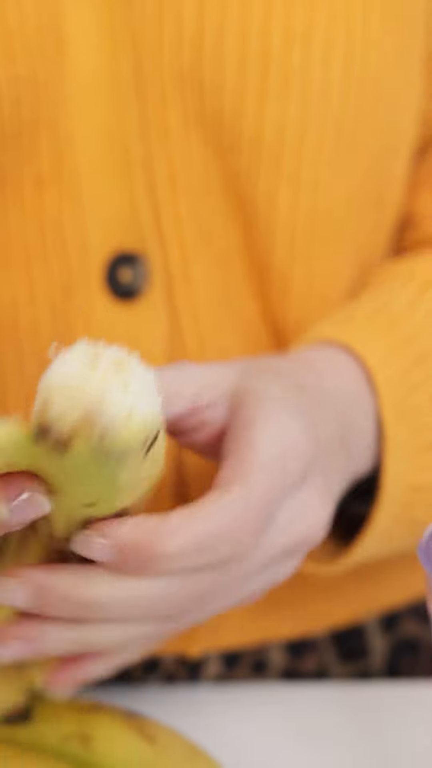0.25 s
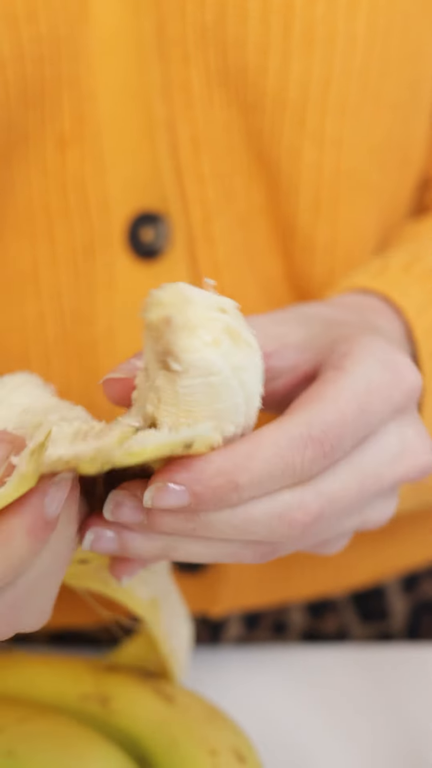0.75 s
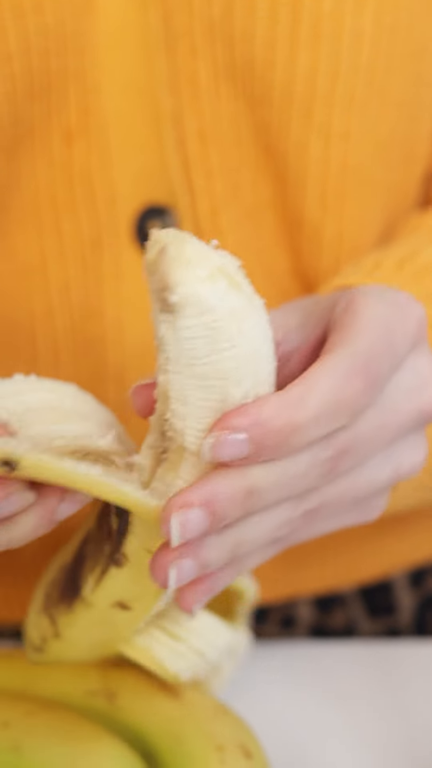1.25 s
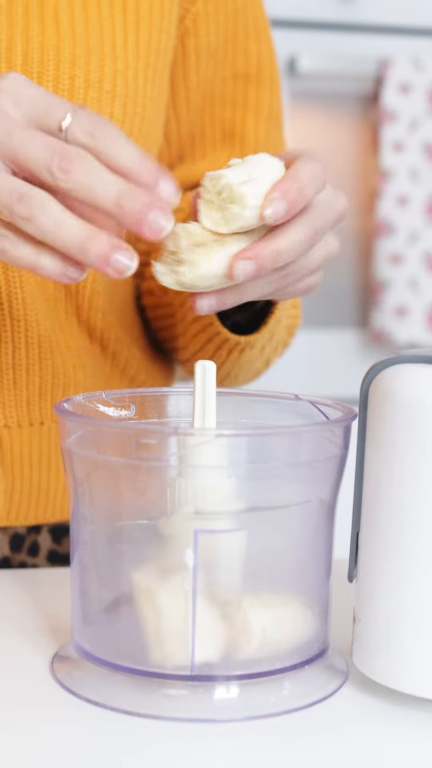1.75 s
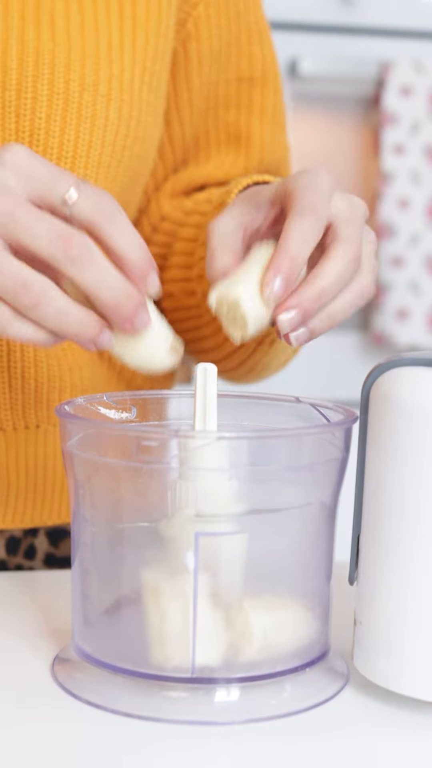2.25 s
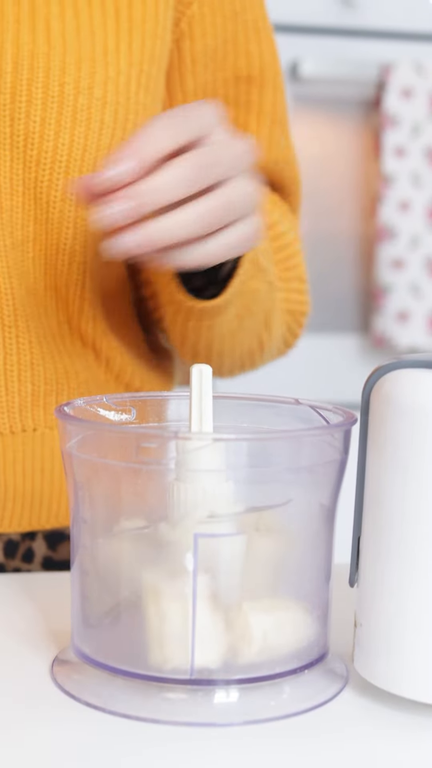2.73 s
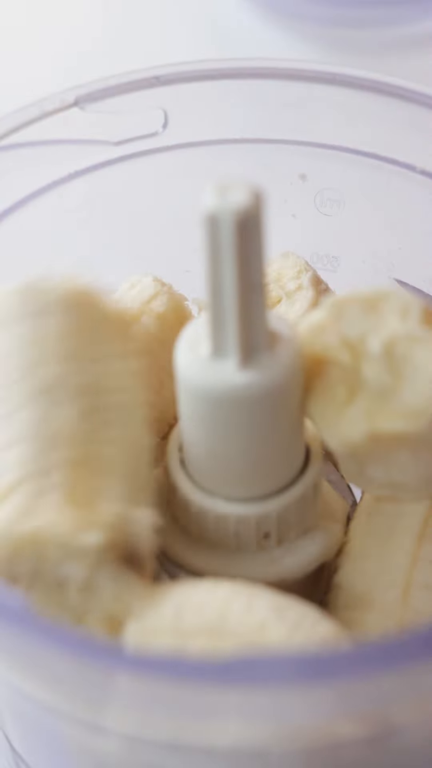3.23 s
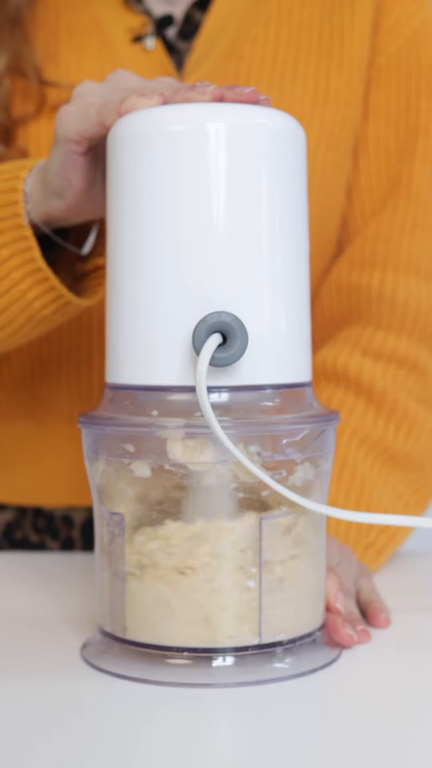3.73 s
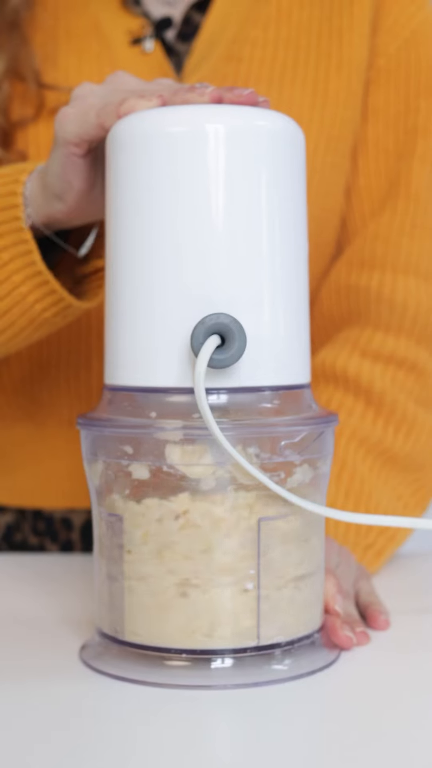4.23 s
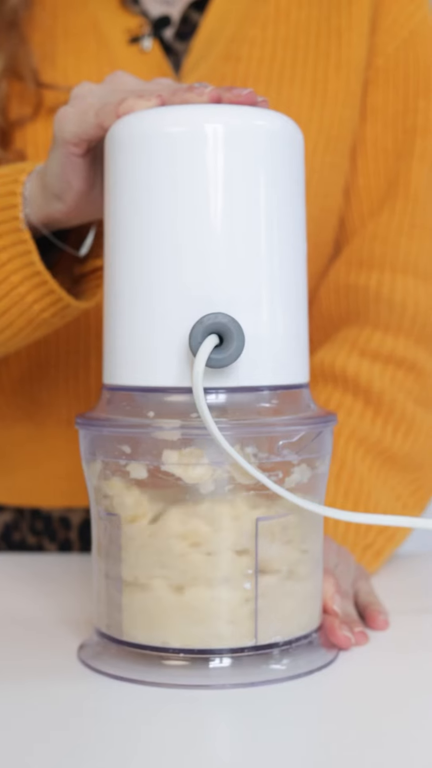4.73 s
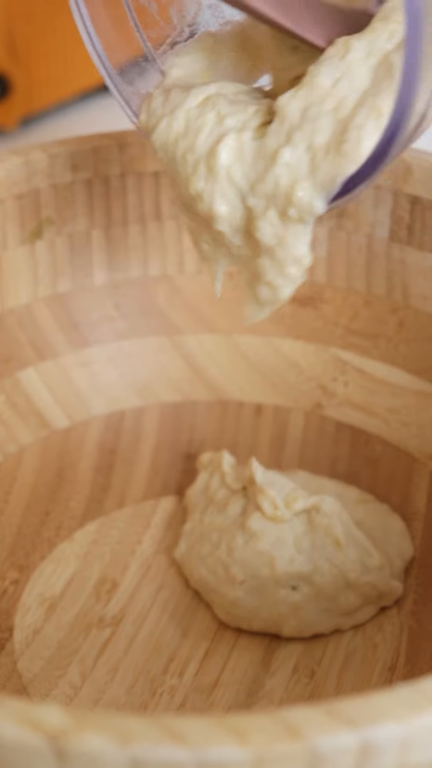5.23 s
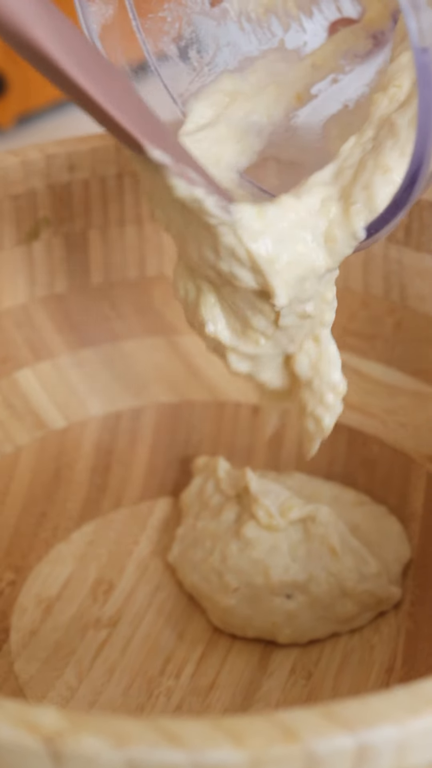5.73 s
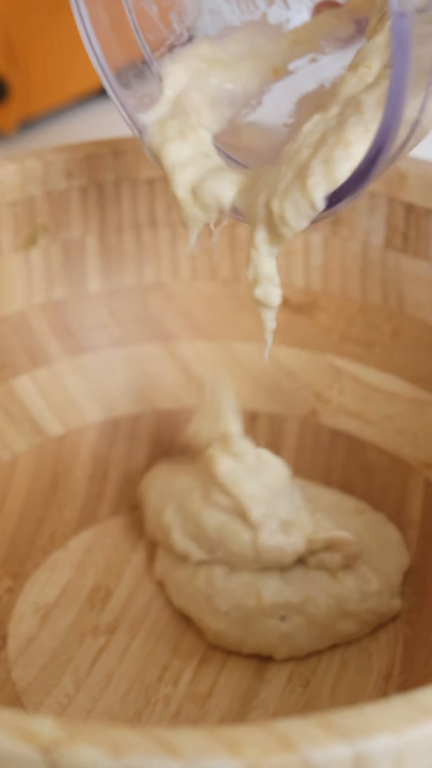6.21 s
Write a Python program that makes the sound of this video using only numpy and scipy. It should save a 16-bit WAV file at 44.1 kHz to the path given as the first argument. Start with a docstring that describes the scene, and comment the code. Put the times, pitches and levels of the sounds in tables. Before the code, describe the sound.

In a quiet kitchen, fruit drops hollowly into a plastic bowl, a mini chopper grinds abruptly on and off, then mash lands softly.

```python
"""Banana in a mini chopper

A banana is peeled and dropped piece by piece into a plastic bowl in a quiet kitchen; each contact rings
the bowl's air cavity and walls. The chopper is heard at full speed, cut in and out abruptly: singing gears,
loaded mainly by one current pulse per mains cycle, over noisy grinding and churning. Then the mash is
scraped out and lands in a wooden bowl, heard as soft knocks and wet ticks. A fridge hums throughout."""
import sys
import numpy as np
from scipy import signal
from scipy.fft import rfft, irfft, next_fast_len
from scipy.io import wavfile

SR = 44100
rng = np.random.default_rng(int(sys.argv[2]) if len(sys.argv) > 2 else 0)


def magnitude_from_level(level_db):
    """Linear magnitude for a level in decibels (20 dB per decade)."""
    exponent = np.asarray(level_db, float) / 20
    return 10 ** exponent


def master_out(mix):
    """Clip the mix to full scale and print it as 16-bit PCM to the path in sys.argv[1]."""
    frames = np.transpose(np.atleast_2d(mix))
    ceiling = np.clip(frames, -1, 1)
    pcm = np.round(ceiling * 32767).astype(np.int16)
    wavfile.write(sys.argv[1], SR, pcm)


N = 285062
T = np.arange(N) / SR   # time in seconds


def rms_one(x):
    """Scale to unit rms."""
    return x / np.sqrt(np.mean(x ** 2) + 1e-20)


def in_time(rows):
    """Join each column by straight lines in time."""
    seconds, *columns = np.transpose(rows)
    return [np.interp(T, seconds, column) for column in columns]


def at_hz(points, hz):
    """Read a spectrum on a logarithmic frequency axis."""
    point_hz, values = np.transpose(points)
    return np.interp(np.log(np.maximum(hz, 1)), np.log(point_hz), values)


def drift(rate_hz):
    """Slow random wander of rms 1: smoothed noise, drawn at every tenth sample."""
    r = np.exp(-20 * np.pi * rate_hz / SR)
    noise = rng.standard_normal(N // 10 + 5002)
    slow = signal.lfilter([1], [1, -2 * r, r * r], noise)[5000:]   # skip the filter's start
    return np.interp(np.arange(N) / 10, np.arange(len(slow)), rms_one(slow))


def coloured(x, spectrum, peaks=()):
    """Give a white signal a spectrum and some resonant boosts; rms 1."""
    hz = np.fft.rfftfreq(N, 1 / SR)
    boosts = sum(boost / (1 + (2 * (hz - centre) / width) ** 2) for centre, width, boost in peaks)
    db = at_hz(spectrum, hz) + boosts
    inside = hz > spectrum[0][0] / 2
    return rms_one(irfft(rfft(x) * magnitude_from_level(db) * inside, N))


def grains(per_s, spread_db):
    """Random clicks of uneven size and sign."""
    uneven_db = spread_db * np.minimum(rng.exponential(1, N), 5)
    sizes = magnitude_from_level(uneven_db) * rng.standard_normal(N)
    return sizes * (rng.random(N) < per_s / SR)


def resonance(x, hz, width_hz):
    """Keep a band around one resonance; rms 1."""
    edges = [hz - width_hz / 2, hz + width_hz / 2]
    return rms_one(signal.sosfilt(signal.butter(2, edges, "band", fs=SR, output="sos"), x))


def add(out, at_s, db, hz, t60, rise_s):
    """One soft blow on one mode: it swells over the contact time and dies."""
    start = int(at_s * SR)
    t = T[:min(int(1.2 * t60 * SR), N - start)]
    swell = (1 - np.exp(-t / rise_s)) ** 2
    out[start:start + len(t)] += magnitude_from_level(db - 60 * t / t60) * swell * np.sin(2 * np.pi * hz * t)


# How long the kitchen echoes. Each row: frequency in Hz, time to fall by 60 dB in seconds.
KITCHEN_DECAY = [(100, 0.47), (700, 0.73), (1800, 0.7), (5000, 0.57), (12000, 0.039)]


def kitchen(x):
    """A diffuse tail of noise bands whose decay time follows the frequency."""
    size = next_fast_len(N + SR)
    edges, tail = 60 * 2.0 ** np.arange(0, 8.1, .5), np.zeros(SR)
    for low, high in zip(edges, edges[1:]):
        sos = signal.butter(2, [low, high], "band", fs=SR, output="sos")
        band = signal.sosfilt(sos, rng.standard_normal(SR))
        tail += band * magnitude_from_level(-60 * T[:SR] / at_hz(KITCHEN_DECAY, np.sqrt(low * high)))
    tail *= np.clip(T[:SR] / 0.015, 0, 1) / np.sqrt(np.sum(tail ** 2))   # fades in over 15 ms; energy 1
    return irfft(rfft(x, size) * rfft(tail, size), size)[:N]


# Spectrum of the room's air noise. Each row: frequency in Hz, relative density in dB.
AIR_COLOUR = [(30, -10), (50, -18.5), (75, -19), (100, -16), (200, -6), (330, -9.5), (520, -7.5),
              (700, -12.5), (1100, -20), (2100, -31), (4000, -35.5), (12500, -39), (13300, -54.5),
              (16000, -71.5)]
# Hum lines of the fridge. Each row: frequency in Hz, relative level in dB.
FRIDGE_LINES = [(50.05, -22), (100.1, -1.5), (300.3, -8), (421, -13.5), (500.5, -13), (640, -14)]
AIR_DB, HUM_DB = -57.5, -56.5   # air noise rms; added to every fridge line


def room_tone():
    """Low air noise and the slowly wavering mains lines of a fridge."""
    hum = 0
    for hz, db in FRIDGE_LINES:
        level = np.sqrt(2) * magnitude_from_level(db + 0.86 * drift(3.1))
        hum = hum + level * np.sin(2 * np.pi * hz * T + 0.45 * drift(3.3))
    air = coloured(rng.standard_normal(N), AIR_COLOUR)
    return magnitude_from_level(AIR_DB + .5 * drift(0.65)) * air + magnitude_from_level(HUM_DB) * hum


SWELL_DB_PER_S, FADE_DB_PER_S = 148, 149   # how fast a movement sets in and dies away


def rustle(moves, colour, per_s):
    """Dense fine crackle that swells, holds unevenly and fades with each movement."""
    level = 0
    for at, hold, db in moves:
        swell_db = SWELL_DB_PER_S * np.maximum(at - T, 0)
        fade_db = FADE_DB_PER_S * np.maximum(T - at - hold, 0)
        level = level + magnitude_from_level(db - swell_db - fade_db)
    return level * magnitude_from_level(1.3 * drift(25)) * coloured(grains(per_s, spread_db=1.0), colour)


# A sleeve brushing past. Each row: start of the hold in seconds, hold in seconds, level in dB.
SLEEVE_MOVES = [(0.02, 0.042, -66), (0.15, 0.033, -79), (0.32, 0.034, -77), (0.46, 0.06, -78),
                (0.885, 0.025, -73.5), (2.89, 0.1, -69), (3.06, 0.11, -72.5), (3.46, 0.16, -66)]
# Spectrum of the cloth. Each row: frequency in Hz, relative density in dB.
CLOTH_COLOUR = [(1200, 7.5), (2500, 2), (6000, -5.5), (9000, -8), (13000, -49)]


def sleeve():
    """Cloth rubbing: very dense fine crackle."""
    return rustle(SLEEVE_MOVES, CLOTH_COLOUR, per_s=17000)


# Tugs at the peel, hands rubbing. Each row: start of the hold in seconds, hold in seconds, level in dB.
PEEL_MOVES = [(0.11, 0.041, -60), (0.33, 0.022, -75.5), (0.47, 0.01, -75), (0.68, 0.094, -63.5),
              (1.27, 0.26, -67), (2.37, 0.03, -77)]
# Spectrum of the peel. Each row: frequency in Hz, relative density in dB.
SKIN_COLOUR = [(1470, -0.5), (2500, -9), (3790, -23), (4710, -5.5), (8260, -6.5), (12600, -4.5),
               (15800, -9)]


def peel():
    """Tugging and rubbing: a sparser, brighter crackle than the sleeve."""
    return rustle(PEEL_MOVES, SKIN_COLOUR, per_s=7100)


# Wet ticks of skin and fruit on plastic, and of mash landing on wood. Each row: start in seconds, peak level in
# dB (roughly), centre in Hz.
WET_TICKS = [(0.0776, -58, 8790), (0.164, -57, 6920), (0.3294, -66, 5140), (0.4734, -61, 4200),
             (0.6924, -53, 4710), (0.7794, -52, 8660), (0.8776, -61, 2300), (0.888, -52, 1590),
             (1.2964, -60, 8860), (1.6386, -45, 5100), (1.715, -41, 4500), (1.757, -53, 5500),
             (1.838, -51.5, 5240), (2.464, -40, 4500), (2.4654, -30.5, 11500), (2.5054, -51, 6470),
             (2.529, -50, 5040), (2.545, -51, 4800), (3.214, -43, 4930), (5.0632, -48.5, 3670),
             (5.458, -56, 3880), (5.774, -56, 3760), (6.103, -51.5, 2830), (6.255, -53, 8880)]
TICK_DECAY_S = 0.0041


def ticks():
    """Short noise bursts around a broad centre."""
    out = np.zeros(N)
    for (at, db, hz), hiss in zip(WET_TICKS, rng.standard_normal((len(WET_TICKS), 3000))):
        band = signal.butter(2, [hz / 1.25, min(hz * 1.59, 16000)], "band", fs=SR)
        burst = rms_one(signal.lfilter(*band, hiss)) * np.exp(-T[:3000] / TICK_DECAY_S)
        start = int(at * SR)
        out[start:start + 3000] += magnitude_from_level(db - 8) * burst   # rms lies 8 dB under the peak
    return out


# Soft knocks of hands, spatula and landing mash. Each row: start in seconds, base level in dB,
# pitch in Hz, then overtone and edge, both in dB relative to the base level (fixed offsets follow below).
SOFT_KNOCKS = [(0.005, -45, 165, -14, -23), (0.029, -41, 260, -11, -20), (0.018, -47, 190, -20, -22),
               (0.04, -43, 232, -24, -14), (0.076, -42, 132, -14, -8), (0.322, -53, 336, -6, -3),
               (0.476, -48, 168, -25, -5.5), (0.488, -45, 179, -25, -25), (0.505, -53.5, 170, -8, -2),
               (0.523, -49, 200, -16, -25), (0.876, -39, 496, -9.5, -10), (1.444, -55, 290, -9, 3.5),
               (5.047, -43, 264, -6, -26.5), (5.063, -33.5, 371, -11, -20), (5.08, -35, 513, -24, -36),
               (5.331, -63.5, 300, -7, -26), (5.773, -48.5, 280, -1.5, -24), (6.102, -26, 388, -10, -29),
               (6.292, -49.5, 290, 6, -37)]
OVERTONE_HZ, OVERTONE_SCATTER = 760, .03
EDGE_SNAP = 8   # the edge opens with a click this many times the hiss
EDGE_LOW_HZ, EDGE_HIGH_HZ, EDGE_DECAY_S = 1200, 1990, 0.002


def knocks():
    """Each knock is a damped pair of low modes, an overtone and a short scraping edge."""
    out = np.zeros(N)
    luck = rng.normal(0, 1, (len(SOFT_KNOCKS), 1001))
    for (at, db, hz, over, edge), (scatter, *hiss) in zip(SOFT_KNOCKS, luck):
        add(out, at, db + 1.5, hz, 14.7 / hz, rise_s=0.00075)
        add(out, at, db + 7.5, 0.767 * hz, 10.0 / hz, rise_s=0.0022)
        overtone_hz = OVERTONE_HZ * (1 + OVERTONE_SCATTER * scatter)
        add(out, at, db + over + 5.5, overtone_hz, .035, rise_s=0.001)
        click_and_hiss = np.r_[EDGE_SNAP, hiss[1:]]
        scrape = resonance(click_and_hiss, (EDGE_LOW_HZ + EDGE_HIGH_HZ) / 2, EDGE_HIGH_HZ - EDGE_LOW_HZ)
        start = int(at * SR)
        out[start:start + 1000] += magnitude_from_level(db + edge) * scrape * np.exp(-T[:1000] / EDGE_DECAY_S)
    return out


# Fruit rocks and slides to rest after a fall. Each row: start in seconds, level in dB,
# decay in dB per second, brightness in dB per octave.
SETTLING_FALLS = [(1.642, -52.5, 81, 2), (2.468, -42.5, 73.5, -3.5), (3.25, -50, 63.5, 0.5)]
# Spectrum of the small contacts. Each row: frequency in Hz, relative density in dB.
CONTACT_COLOUR = [(250, 0), (500, -10), (800, 3), (1200, 0.5), (1500, -9), (1900, -19.5), (2400, -23),
                  (4000, -35.5)]
# One wall mode struck where it swings most. Each row: start in seconds, peak level in dB,
# frequency in Hz, time to fall by 60 dB in seconds.
PINGS = [(1.651, -42, 1140, 0.023), (1.716, -43, 5460, 0.013), (1.639, -46, 1880, 0.027),
         (1.659, -31.5, 1820, 0.022), (2.465, -25, 1645, 0.027), (2.465, -21.5, 934, 0.027),
         (2.487, -45, 1620, 0.031), (2.51, -42, 1820, .02), (2.527, -36.5, 1930, .03),
         (2.529, -35, 1430, .02), (2.543, -45, 1830, .02), (3.215, -39, 2410, .022),
         (3.218, -45, 2060, 0.029), (3.247, -22.5, 182, 0.037), (3.247, -37, 1500, 0.022),
         (3.256, -41, 1190, 0.037), (3.276, -40.5, 950, .025), (3.289, -44.5, 1350, .025),
         (3.3, -41, 1080, .025), (3.311, -46, 1400, .02)]


def settling():
    """Dense small contacts in the bowl, dying away, and the single wall modes that ring out."""
    out = np.zeros(N)
    for at, db, loss_db, tilt_db in SETTLING_FALLS:
        colour = [(hz, level + tilt_db * np.log2(hz / 800)) for hz, level in CONTACT_COLOUR]
        envelope = np.clip((T - at) / 0.0053, 0, 1) * magnitude_from_level(db - loss_db * np.maximum(T - at, 0))
        out += envelope * coloured(grains(1400, spread_db=2.3), colour)
    for at, db, hz, t60 in PINGS:
        add(out, at, db, hz, t60, rise_s=0.00076)
    return out


# Fruit against the plastic bowl. Each row: start in seconds, base level in dB, cavity pitch in Hz,
# then low thud and wall ring, both in dB relative to the base level.
CONTACTS = [(1.625, -34, 637, -8, -17), (1.64, -33, 734, -4, -3), (1.651, -27.5, 633, -12, -28),
            (1.66, -33.5, 627, -27, -11), (1.715, -20, 611, -27, -40), (1.723, -22.5, 682, -12, -27),
            (1.734, -32.5, 660, -12, -33), (1.745, -35, 674, -20, -39), (1.761, -29.5, 661, -3, -40),
            (1.78, -36, 634, -10, -35), (1.801, -40, 655, 3.5, -22), (1.84, -42, 680, -28, -36),
            (1.855, -36.5, 672, -22, -31), (1.864, -37, 720, -24, -33), (1.874, -36.5, 670, -8, -34),
            (1.888, -44, 680, -22, -36), (1.922, -46, 670, 1, -36), (1.944, -43, 705, -14, -29),
            (2.458, -36, 710, 2, -18), (2.464, -17, 708, -9, -11), (2.469, -20, 714, -6, -9),
            (2.483, -23, 654, -22, -31), (2.504, -28, 826, -23, -31), (2.511, -29, 505, 1, -24),
            (2.528, -25.5, 730, -31, -10.5), (2.544, -30.5, 563, -10, -25), (2.563, -33.5, 800, -16, -27),
            (2.598, -41, 600, -5, -25), (2.636, -37, 744, -11, -28), (2.66, -40, 800, -26, -23),
            (2.694, -42, 724, -16, -22), (3.213, -46, 800, -23, -1), (3.218, -27, 594, -10, -11),
            (3.242, -25, 625, -10, -13), (3.2462, -16.5, 706, -30.5, -27), (3.257, -25, 740, -28, -10),
            (3.269, -37, 634, -11, -18), (3.289, -33.5, 635, -1, -22), (3.309, -43, 690, 0.5, -16),
            (3.325, -45, 664, -3, -16), (3.342, -31, 730, -10, -30), (3.355, -41, 710, -17, -14),
            (3.394, -48, 710, 4, -12)]
# Modes of bowl walls and worktop. Each row: frequency in Hz, relative level in dB,
# time to fall by 60 dB in seconds.
BOWL_MODES = [(81, -3, 0.14), (109.7, 7.5, 0.066), (177, -8, 0.12), (272, 3.5, 0.046), (393, -0.5, 0.058),
              (494, -3.5, 0.05), (922, 10, 0.0091), (1070, -0.5, 0.016), (1285, -9.5, 0.047),
              (1686, 1.5, 0.023), (1890, 2, 0.023), (2250, -10, 0.033), (2920, -25, 0.0096),
              (5080, -12, 0.012)]
EMPTY_RING_S, RING_LOSS_PER_S = 0.05, 0.5   # the cavity rings shorter as fruit fills the bowl
WALL_DULLING_DB_PER_S = 6.5   # fruit damps the highest wall modes as the bowl fills


def drops():
    """Every contact rings the air cavity, whose pitch shifts as the bowl fills, and all wall modes."""
    out = np.zeros(N)
    luck = rng.normal(0, 1, (len(CONTACTS), len(BOWL_MODES)))
    for (at, peak, cavity_hz, thud, wall), chances in zip(CONTACTS, luck):
        filling_s = at - CONTACTS[0][0]
        ring_s = EMPTY_RING_S * np.exp(-RING_LOSS_PER_S * filling_s)
        dulled_db = WALL_DULLING_DB_PER_S * filling_s
        cavity_db = peak + 3.25 - 0.022 * (wall + 40)   # hard hits feed the walls more
        add(out, at, cavity_db, cavity_hz, ring_s, rise_s=0.00073)
        balance = [(300, thud), (650, 0), (1300, wall), (2000, wall - dulled_db)]
        for (hz, db, t60), chance in zip(BOWL_MODES, chances):
            mode_db = peak + at_hz(balance, hz) + db - 2.0 + 1.9 * chance
            add(out, at, mode_db, hz * (1 + 0.04 * chance), t60, rise_s=0.65 / hz)
    return out


MAINS_HZ, PULSE_AT_S = 50.04, 4.1443   # PULSE_AT_S: the moment of one strong pulse
WEAK_PULSE = 0.05   # height of the second half-cycle's pulse; the strong one is about 1
PULSE_TAIL_S, PULSE_TAIL = 0.005, 0.15   # the housing rings on after each pulse: decay and share


def pulse(lag_s, sharp, rest, tail=0):
    """Torque from a strong and a weak current pulse per mains cycle, ringing on, over a resting part; rms 1."""
    swing = np.cos(2 * np.pi * MAINS_HZ * (T - PULSE_AT_S - lag_s))
    push = np.exp(sharp * (swing - 1)) + WEAK_PULSE * np.exp(-sharp * (swing + 1))
    r = np.exp(-1 / (PULSE_TAIL_S * SR))
    ringing = signal.lfilter([1 - r], [1, -r], push)
    return rms_one(rest + push + tail * ringing)


# Gear mesh rate, mean over a mains cycle, wavering and rising as the load eases.
# Each row: time in seconds, rate in Hz.
MESH_SPEED = [(3.66, 1163), (3.86, 1169), (3.95, 1219), (4.06, 1227), (4.12, 1213), (4.22, 1212),
              (4.26, 1240), (4.33, 1251), (4.39, 1222), (4.43, 1239), (4.74, 1238), (4.8, 1245),
              (5.0, 1247)]
# Partials of the two gear stages, as multiples of the mesh rate.
PARTIAL_MULTIPLES = [1, 2, 3, 4, 5, 6, .84, 1.656]
# The same partials, in order. Each row: relative level in dB, lag behind the current pulse in seconds,
# gain with speed in dB per Hz.
PARTIALS = [(3.6, .0024, .008), (0, -.0002, .07), (-9.5, .0006, .03), (-5.5, .0006, .04),
            (-25, -.0004, .035), (-25, -.0004, -.01), (-12, .0016, .0), (-26, -.002, .035)]
FREE_HZ = 1236   # reference near the unloaded speed, where the partials have their table levels
GEAR_TAIL = 0.9   # larger ringing share for the singing teeth
GLIDE_HZ, GLIDE_LEAD_S = 45, .001   # the partial at the mesh rate itself starts sharp and sags through each pulse


def gear_teeth(mesh_hz):
    """Gear teeth sing under each torque pulse, at pitches locked to the wavering mesh rate."""
    mains_turn = 2 * np.pi * MAINS_HZ * (T - PULSE_AT_S)
    # the rotor gains speed in each pulse, more so under load
    ripple_hz = (11 + .4 * (FREE_HZ - mesh_hz)) * np.cos(mains_turn - 2 * np.pi * MAINS_HZ * .002)
    phase = 2 * np.pi * np.cumsum(mesh_hz * (1 + .0018 * drift(8)) + ripple_hz) / SR
    glide = GLIDE_HZ / MAINS_HZ * np.sin(mains_turn + 2 * np.pi * MAINS_HZ * GLIDE_LEAD_S)
    teeth = 0
    for multiple, (db, lag, per_hz) in zip(PARTIAL_MULTIPLES, PARTIALS):
        level = magnitude_from_level(db + per_hz * (mesh_hz - FREE_HZ) + 0.4 * drift(40))
        # low partials ring on in the housing, so their pulses are longer
        throb = pulse(lag, 3.4 * np.sqrt(np.sqrt(multiple)), .03, GEAR_TAIL / np.sqrt(multiple))
        tone = np.sin(multiple * phase + glide * (multiple == 1) + 0.4 * drift(25))
        teeth = teeth + level * throb * tone
    return teeth


# Spectrum of the grinding. Each row: frequency in Hz, relative density in dB.
GRIND_COLOUR = [(500, -32), (800, -46), (1250, -14.5), (1700, -22), (2050, -17.5), (2450, -15),
                (2900, -20.5), (3400, -24), (3750, -21.5), (4050, -30), (4400, -20.5), (5000, -18),
                (5700, -26.5), (6600, -30.5), (8200, -45.5), (10500, -44.5), (15800, -54.5)]
# Resonances of the housing. Each row: centre in Hz, width in Hz, boost in dB.
HOUSING_PEAKS = [(6560, 350, -4), (7150, 360, 6.5), (8990, 280, 9), (12200, 344, -2.5)]


def grinding(uneven):
    """Noise that throbs with each pulse, coloured by the housing."""
    throb = pulse(-0.00038, sharp=4.3, rest=0.69, tail=PULSE_TAIL)
    return coloured(rng.standard_normal(N) * throb * uneven, GRIND_COLOUR, HOUSING_PEAKS)


# Housing resonances shaken at other moments of the cycle. Each row: centre in Hz, width in Hz,
# level in dB rms, lag in seconds, steady part relative to the strong pulse.
RATTLES = [(1305, 300, -34.5, -0.0056, 2), (2440, 360, -40, -0.033, 2.5), (2042, 213, -40, -0.0105, 1.3),
           (2870, 820, -41.5, -0.0083, 2.8), (4245, 296, -43.5, .0095, 0.35)]


def rattling():
    """Throbbing noise through single housing resonances."""
    out = np.zeros(N)
    for hz, width, db, lag, steady in RATTLES:
        shaken = rng.standard_normal(N) * pulse(lag, sharp=1.7, rest=steady)
        out += magnitude_from_level(db) * resonance(shaken, hz, width)
    return out


# Spectrum of the brushes crackling. Each row: frequency in Hz, relative density in dB.
SPARK_COLOUR = [(3000, -27.5), (6000, -11.5), (8500, 9), (11000, 0.5), (15800, -8.5)]


def brush_sparks():
    """Brushes crackle: random clicks, strongest around each current pulse."""
    return coloured(grains(3000, spread_db=0.0) * pulse(-.001, sharp=4.2, rest=0.14), SPARK_COLOUR)


# Spectrum of the churning mash. Each row: frequency in Hz, relative density in dB.
CHURN_COLOUR = [(24, -52.5), (40, -21), (65, -16.5), (87, -12), (123, -7), (151, 1.5), (214, -6),
                (479, -0.5), (857, -5.5), (1050, 0.5), (1430, -21), (2420, -120)]


def churning():
    """Mash tumbles: dense low-pitched grains that throb only slightly."""
    return coloured(grains(9000, spread_db=2.26) * pulse(0.0057, sharp=0.8, rest=7.2), CHURN_COLOUR)


# Hum lines of the motor. Each row: frequency in Hz, level in dB rms (before its slow wander).
MOTOR_LINES = [(100.1, -46), (150.1, -44), (301, -48.5), (421, -49.5), (474, -43.5)]


def motor_hum():
    """Steady low tones with a slowly wandering level and phase."""
    out = np.zeros(N)
    for hz, db in MOTOR_LINES:
        level = np.sqrt(2) * magnitude_from_level(db + 0.61 * drift(11))
        out += level * np.sin(2 * np.pi * hz * T + 0.85 * drift(2.6))
    return out


# A lump of fruit meets the blade. Each row: moment in seconds, surge of churning in dB.
FRUIT_LUMPS = [(3.76, 4.5), (3.97, 3.5), (4.46, 5.5), (4.75, 3), (4.92, -1.5)]
LUMP_S, LUMP_MUTES_MESH = 0.015, 0.34   # half length of a surge; share of its dB that the gears lose
MESH_DB, GRIND_DB, CHURN_DB, SPARKS_DB = -30.5, -32, -29, -55.5


def motor():
    """Singing gears, grinding, rattles, sparks and hum; lumps swell the churning and mute the gears."""
    mesh_hz, = in_time(MESH_SPEED)
    surge_db = sum(db * np.exp(-((T - at) / LUMP_S) ** 2) for at, db in FRUIT_LUMPS)
    uneven = magnitude_from_level(0.5 * drift(34))   # the load differs from pulse to pulse
    gears = magnitude_from_level(MESH_DB - LUMP_MUTES_MESH * surge_db) * gear_teeth(mesh_hz) * uneven
    grind = magnitude_from_level(GRIND_DB) * grinding(uneven)
    sparks = magnitude_from_level(SPARKS_DB) * brush_sparks()
    churn = magnitude_from_level(CHURN_DB + surge_db) * churning()
    return gears + grind + rattling() + sparks + churn + motor_hum()


MOTOR_ON_S, MOTOR_OFF_S = 3.6625, 5.0045


def scene():
    """Handling sounds and the motor in the room, over the room tone."""
    falling, soft, bright, running = drops() + settling(), knocks(), ticks(), motor()
    wet = kitchen(magnitude_from_level(-12.0) * falling + magnitude_from_level(-14.5) * soft + magnitude_from_level(-6.5) * bright)
    fed = (T > MOTOR_ON_S - .4) * (T < MOTOR_OFF_S)   # feeds the echo early, so it is built up at the start
    cut_in = np.clip((T - MOTOR_ON_S) / 0.00062, 0, 1)
    cut_out = np.clip((MOTOR_OFF_S - T) / 0.0019, 0, 1)
    # the motor's echo is cut in and out along with it
    motor_heard = cut_in * cut_out * (running + magnitude_from_level(-17) * kitchen(running * fed))
    return (falling + soft + bright + wet + peel() + sleeve() + motor_heard + room_tone())[None]


def low_pass(x):
    """Removes everything above the highest recorded frequency."""
    return signal.sosfilt(signal.butter(12, 16490, fs=SR, output="sos"), x)


def record(dry):
    """A phone microphone: the deep bass and the very top are cut."""
    no_top = signal.sosfilt(signal.cheby2(12, 60, 15950, fs=SR, output="sos"), dry)
    mix = signal.sosfilt(signal.butter(3, 45, "high", fs=SR, output="sos"), no_top)
    return low_pass(mix)


dry = scene()
out = record(dry)
master_out(out)
```